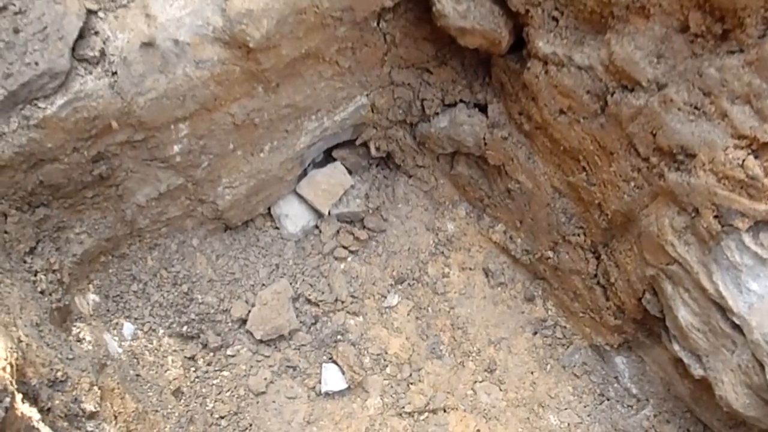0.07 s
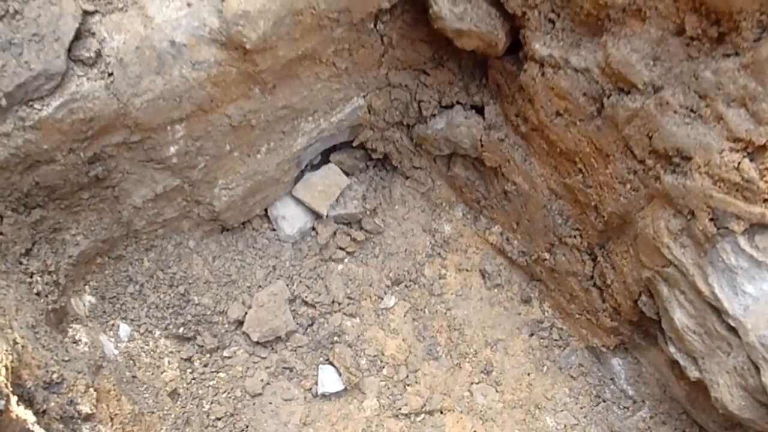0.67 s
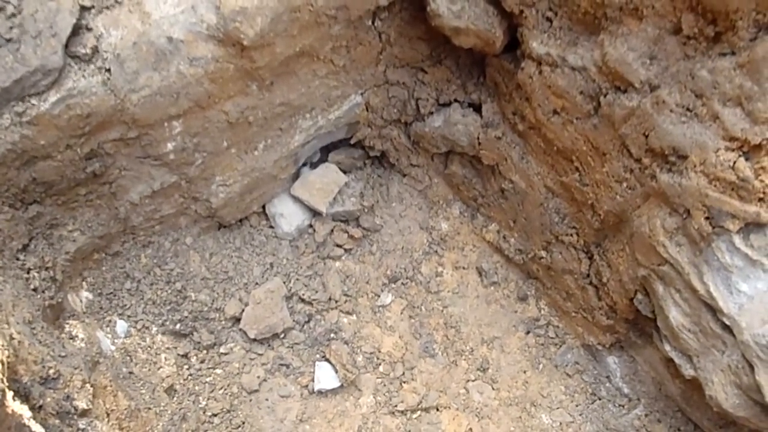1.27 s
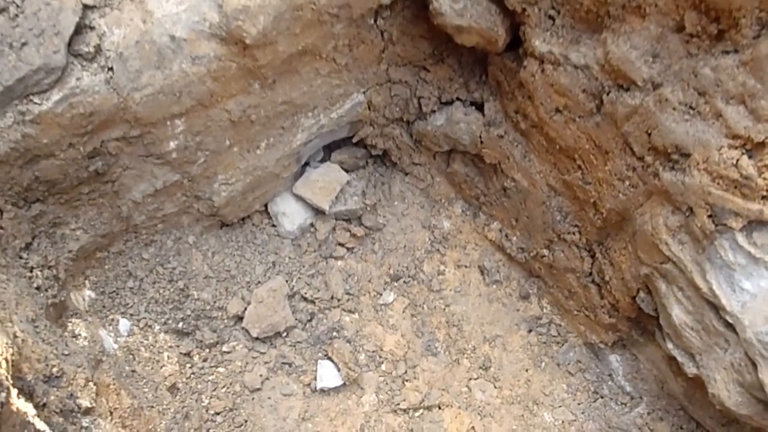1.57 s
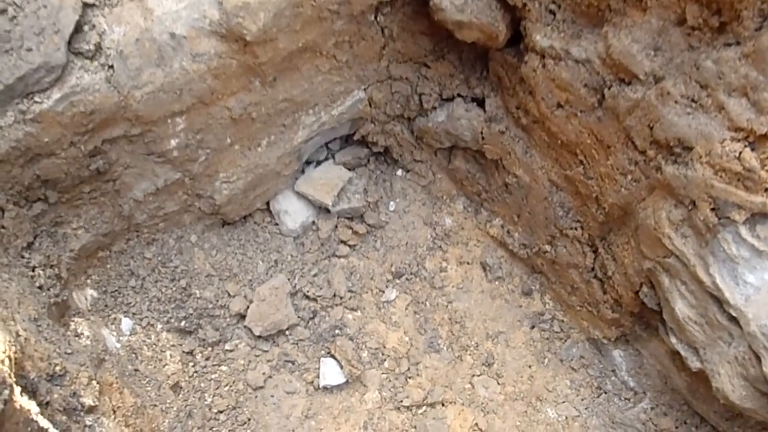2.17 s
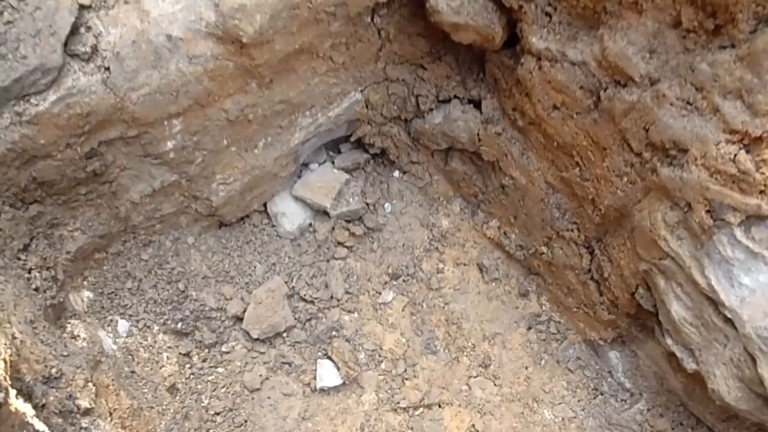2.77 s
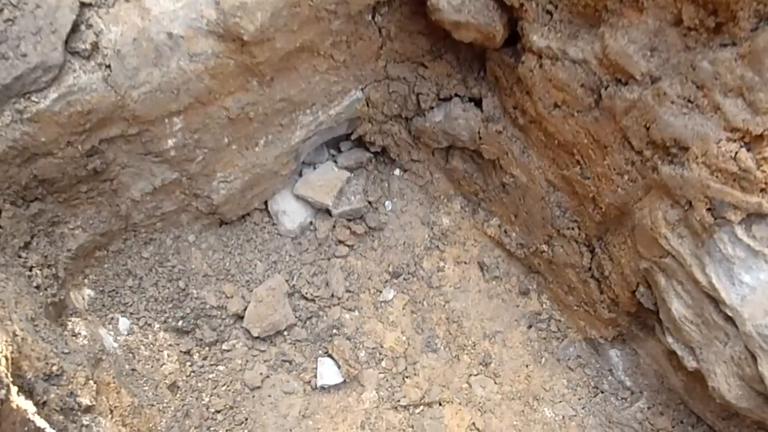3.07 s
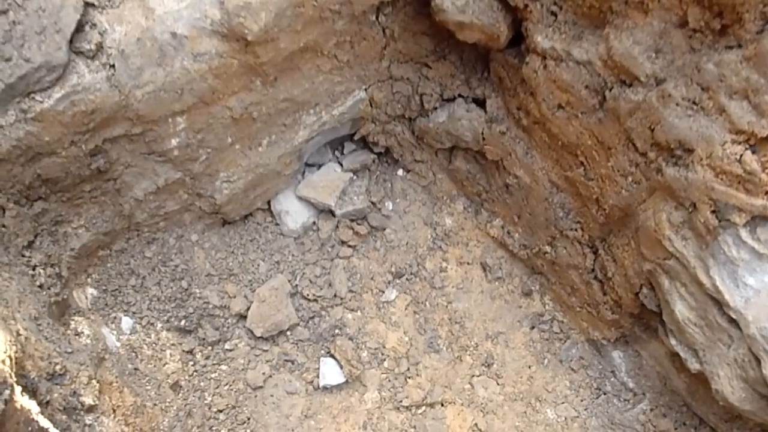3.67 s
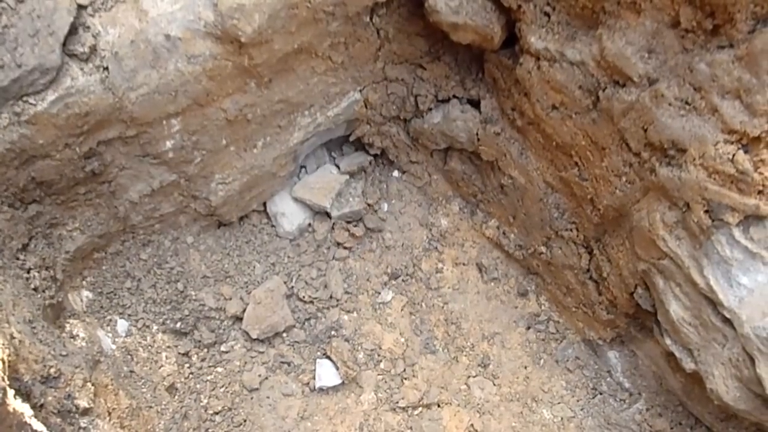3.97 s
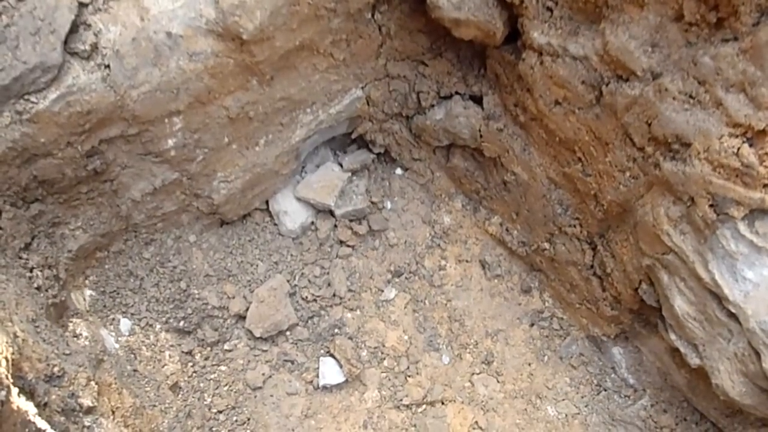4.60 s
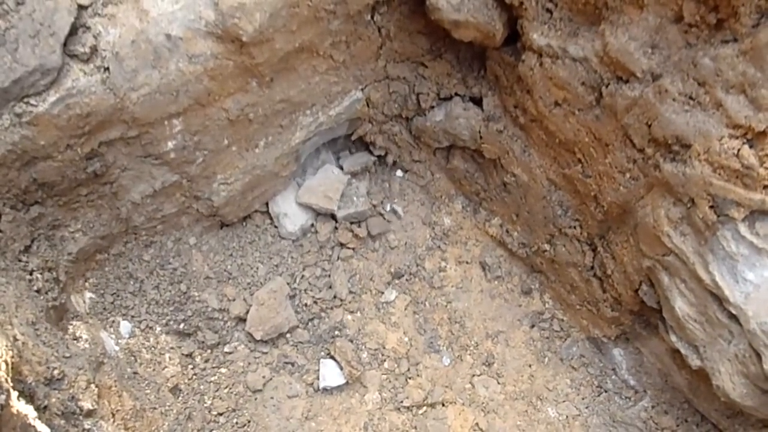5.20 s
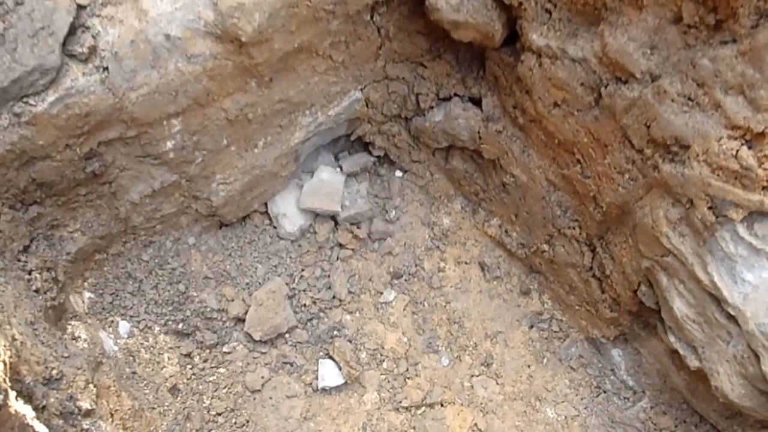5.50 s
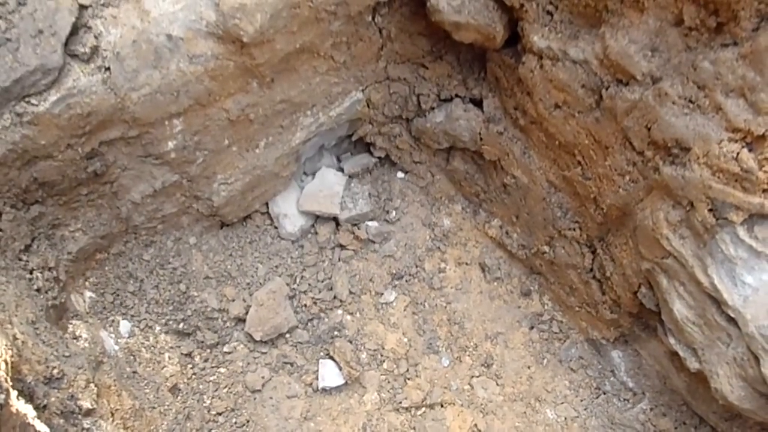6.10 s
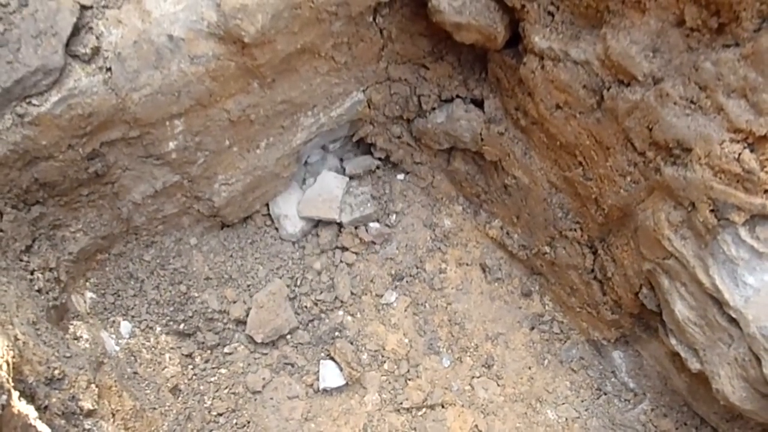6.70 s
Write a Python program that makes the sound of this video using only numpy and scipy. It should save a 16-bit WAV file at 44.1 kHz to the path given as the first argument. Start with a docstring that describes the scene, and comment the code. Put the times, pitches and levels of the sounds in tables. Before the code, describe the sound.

Heard close up in a small dug pit, an air-driven tool pounds through rocky ground in a quick, even rhythm. Hard, gritty thumps alternate irregularly with lighter stony clatter carrying a thin metallic ring. Past the middle comes a run of solid blows, then the strength varies again. Low throbbing and a constant airy hiss continue throughout, the hiss dipping slightly at each loud hit.

```python
"""Low throbbing and hammering, about seven blows a second, over a steady hiss: a pneumatic mole
works just behind the rock wall of a small dug pit. A blow that bites thumps the rock face and
cracks grit; one that slips rattles loose stones and rings the steel body instead. Air throbs in
the bore and hisses out between blows. A limiter ducks at loud blows, and the hiss swells partway
back before the next."""
import sys
import numpy as np
from scipy import signal
from scipy.fft import rfft, irfft, next_fast_len
from scipy.io import wavfile
from scipy.ndimage import uniform_filter1d, minimum_filter1d

SR = 44100
rng = np.random.default_rng(int(sys.argv[2]) if len(sys.argv) > 2 else 0)


def store_wav(level_fs):
    """Save 16-bit WAV to argv[1]."""
    pcm = np.round(np.clip(np.atleast_2d(level_fs), -1, 1) * 32767)
    wavfile.write(sys.argv[1], SR, pcm.T.astype(np.int16))


N = 302085
BLOW_T_S = np.arange(4096) / SR


def from_db(db):
    """Decibels to gain."""
    return 10 ** (np.asarray(db) / 20)


def unit_energy(x):
    """Scale to the energy of 10 ms at rms 1."""
    return x / np.sqrt(np.sum(x ** 2) / (SR / 100) + 1e-20)


def add(out, x, start_s):
    """Mix x into out from start_s on."""
    at = int(round(start_s * SR))
    x, at = x[max(-at, 0):], max(at, 0)
    out[at:at + len(x)] += x[:max(N - at, 0)]


def resonance(x, hz, width_hz):
    """Band-pass, peak gain 1."""
    r = np.exp(-np.pi * width_hz / SR)
    feedback = [1, -2 * r * np.cos(2 * np.pi * hz / SR), r * r]
    return signal.lfilter(np.array([1, 0, -1]) * (1 - r * r) / 2, feedback, x + 1e-18)


def ring(drive, hz, t60_s):
    """Damped mode: a unit click starts a sine of height 1."""
    r, w = np.exp(-np.log(1000) / (t60_s * SR)), 2 * np.pi * hz / SR
    return signal.lfilter([0, np.sin(w)], [1, -2 * r * np.cos(w), r * r], drive + 1e-18)


def noise(spectrum, shape=(N,)):
    """Noise of rms 1; spectrum rows are (frequency [Hz], relative density [dB])."""
    hz, level_db = np.transpose(spectrum)
    size = next_fast_len(shape[-1])
    bins_hz = np.maximum(np.fft.rfftfreq(size, 1 / SR), 1)
    gain = from_db(np.interp(np.log(bins_hz), np.log(hz), level_db))
    x = irfft(rfft(rng.standard_normal(shape), size) * gain, size)
    return x[..., :shape[-1]] / x.std()


def swell(start_s, rise_s):
    """Envelope: 0 until start_s, 1 after a further rise_s, then decay."""
    u = np.maximum(BLOW_T_S - start_s, 0) / max(rise_s, 1e-5)
    return u * np.exp(1 - u)


def clicks(times_s, sizes):
    """Train of one-sample clicks."""
    out = np.zeros(N)
    for s, size in zip(times_s, sizes):
        add(out, np.array([size]), s)
    return out


# Piston blows: (time [s], bite [dB]); near 0 lands squarely, near -18 slips
BLOWS = [(0.0786, -15.5), (0.2172, -1), (0.3594, -16.5), (0.4974, -1.5), (0.6385, -18.0), (0.7776, -4.5),
         (0.915, -8.5), (1.0502, -0.5), (1.1913, -12.5), (1.33, -5), (1.4646, 0), (1.6047, -15),
         (1.7432, 0.5), (1.8902, -17), (2.0295, -3.0), (2.1665, -8), (2.302, 1), (2.4438, -17),
         (2.5832, -8.5), (2.7185, 1.5), (2.8593, -18.5), (2.999, -7), (3.1358, 1.0), (3.2809, -18),
         (3.4207, -3.0), (3.5544, -1), (3.6921, -8.5), (3.8279, 0.5), (3.9743, -16.5), (4.1144, -2),
         (4.2489, -3.5), (4.3837, -4.0), (4.519, -1.5), (4.6535, -1), (4.7896, -2), (4.9244, -2.0),
         (5.061, -3.0), (5.1957, 0), (5.3371, -17), (5.4776, -1.5), (5.619, -20), (5.7596, -7), (5.8965, 0),
         (6.0412, -16), (6.182, -3), (6.3162, -2.5), (6.452, -0.5), (6.5871, 0.5), (6.7317, -17)]
STRIKES_S, BITE_DB = np.transpose(BLOWS)

def bite_level_db(full_bite_db, slope, spread_db):
    """A part's level at each blow: linear in the bite, plus chance."""
    return full_bite_db + slope * BITE_DB + rng.normal(0, spread_db, len(BLOWS))


# Colour drift as the tool works forward:
# (time [s], knock [dB], clack [dB], clink [dB], steel ring [dB], clink pitch [Hz])
ADVANCE = [(0.1, -1.7, -6, -6.5, -0.2, 4820), (1.498, -1.5, 3, 3, 11.5, 4830), (2.2, 1, 0.5, -0.5, 5, 4980),
           (3.1, -3.6, -2, -6.5, 5.5, 4810), (4.2, 3, -4.3, 0.5, -4.5, 4936),
           (5.0, 2, -6, -0.1, -0.5, 4820), (5.7, 0.3, -5.8, 3.5, 0.5, 5130),
           (6.7, -2.3, -0.9, -4.2, -3.5, 4980)]

def advance():
    """Four level offsets and the clink pitch, interpolated to each blow."""
    time_s, *columns = np.transpose(ADVANCE)
    return [np.interp(STRIKES_S, time_s, column) for column in columns]


# Air and site noise: (frequency [Hz], relative density [dB])
SITE_SPECTRUM = [(25, -34.5), (40, -17.5), (60, 10.5), (130, 9.5), (260, 7), (450, 5.5), (800, 1.5),
                 (1300, -5), (1900, -2.5), (2700, -10), (4700, -1.5), (6000, -11), (7200, -13.5),
                 (9000, -19), (14000, -17.5)]

def site_hiss(db):
    """Steady background of air and site."""
    return from_db(db) * noise(SITE_SPECTRUM)


# Air column behind the tool: (frequency [Hz], width [Hz], level [dB])
BORE_MODES = [(84.3, 10.1, 4.5), (59.7, 6.1, -8), (243, 11, -16), (294, 14, -20.5), (412, 8.8, -19)]

def bore_throb(valve_lead_s, valve_db, recoil_lag_s, recoil_db, soften_hz):
    """The air column throbs twice a cycle: as the piston turns round and as the tool recoils."""
    next_strike_s = STRIKES_S[-1] + np.median(np.diff(STRIKES_S))
    turns_s = np.append(STRIKES_S, next_strike_s) - valve_lead_s
    puffs = clicks(turns_s, from_db(valve_db + rng.normal(0, 1, len(turns_s))))
    puffs -= clicks(STRIKES_S + recoil_lag_s, np.full(len(BLOWS), from_db(recoil_db)))
    out = np.zeros(N)
    for hz, width_hz, db in BORE_MODES:
        mode = ring(puffs, hz, t60_s=np.log(1000) / (np.pi * width_hz))
        # soft puffs: each mode builds up gradually
        out += from_db(db) * resonance(resonance(mode, hz, soften_hz), hz, soften_hz)
    return out


def throb_ticks(throb, db, spread_db, dull_hz):
    """Faint dull ticks at each trough of the low throb, far louder when it throbs hard."""
    troughs, _ = signal.find_peaks(-throb, distance=SR // 130)
    depth = np.clip(-throb[troughs] / np.abs(throb).max(), 0, 1)
    chance_db = rng.normal(0, spread_db, len(troughs))
    ticks = clicks(troughs / SR, -depth ** 3 * from_db(db + chance_db))
    band = signal.butter(1, [300, dull_hz], "band", fs=SR, output="sos")
    return signal.sosfilt(band, ticks + 1e-18)


# Hollow of the pit: (frequency [Hz], width [Hz], level [dB])
PIT_MODES = [(190, 120, -17), (266, 48, 10), (444.5, 54.4, 8), (532.5, 70, 6), (671.5, 66, 4),
             (1058, 150, 5)]

def rock_thump():
    """The rock face jumps: one short pressure pulse, prolonged by the hollow of the pit."""
    pulse = -swell(0, rise_s=0.00014 * np.exp(rng.normal(0, 0.2)))
    hollow = sum(from_db(db + rng.normal(0, 3.6)) * resonance(pulse, hz, width_hz)
                 for hz, width_hz, db in PIT_MODES)
    return unit_energy(pulse + hollow)


def stone(hz, t60_s, start_s, rise_s, rough):
    """A stone is shaken into a heavily damped resonance; grinding contacts roughen it."""
    shake = np.sin(2 * np.pi * (hz * BLOW_T_S + rng.random()))
    grind = resonance(rng.standard_normal(len(BLOW_T_S)), hz, hz / 3)
    drive = swell(start_s, rise_s) * (shake + rough * grind / grind.std())
    return unit_energy(resonance(drive, hz, width_hz=np.log(1000) / (np.pi * t60_s)))


def grit_crack(start_s, rise_s, band_hz):
    """Grit is crushed in about a millisecond, just after the rock moves."""
    crush = rng.standard_normal(len(BLOW_T_S)) * swell(start_s, rise_s) ** 2
    band = signal.butter(1, band_hz, "band", fs=SR, output="sos")
    return unit_energy(signal.sosfilt(band, crush))


# Echoes off the pit walls: (delay [s], gain [ratio])
WALL_ECHOES = [(.0021, 0.43), (.0039, -0.27), (.0052, -0.15), (.0096, -0.068)]
# Sound scattered in the pit: (frequency [Hz], relative density [dB])
SCATTER_SPECTRUM = [(100, -7), (300, -41.5), (500, -10.5), (800, -8.5), (1200, -7.5), (1900, 4.5),
                    (2800, -7.5), (4000, -5.5), (5000, -2), (7000, -9), (10000, -38), (14000, -21.5)]

def hammering(scatter_db, scatter_t60_s, echo_wander, wear_per_s):
    """Each blow: thump, four ever smaller stones and a crack, then wall echoes and a scattered tail."""
    tail_envelope = from_db(-60 * BLOW_T_S / scatter_t60_s) * np.clip((BLOW_T_S - 0.001) / 0.00083, 0, 1)
    tails = noise(SCATTER_SPECTRUM, (len(BLOWS), len(BLOW_T_S))) * tail_envelope
    wall_lowpass = signal.butter(4, 5500, fs=SR, output="sos")
    knock_drift_db, clack_drift_db, clink_drift_db, _, clink_pitch_hz = advance()
    wear_db = wear_per_s * STRIKES_S * BITE_DB  # as loose grit is used up, bite matters more
    thump_gain = from_db(bite_level_db(-5.5, slope=0.95, spread_db=0.24))
    knock_gain = from_db(bite_level_db(-14, slope=0.069, spread_db=0.79) + knock_drift_db)
    ring_gain = from_db(bite_level_db(-21.5, slope=-0.65, spread_db=1.2))
    clack_gain = from_db(bite_level_db(-18, slope=-0.41, spread_db=1.4) + clack_drift_db)
    clink_gain = from_db(bite_level_db(-13, slope=-0.03, spread_db=1.2) + clink_drift_db)
    crack_gain = from_db(bite_level_db(-5, slope=0.58, spread_db=1.3) + wear_db)
    out = np.zeros(N)
    for i, strike_s in enumerate(STRIKES_S):
        settling = np.exp(rng.normal(0, [0.14, 0.014, 0.044, 0.025]))  # stones resettle each time
        knock_hz, ring_hz, clack_hz, clink_hz = settling * [1200, 1890, 3900, clink_pitch_hz[i]]
        blow = (
            thump_gain[i] * rock_thump()
            + knock_gain[i] * stone(knock_hz, t60_s=0.0022, start_s=0.0001, rise_s=0.00053, rough=0.82)
            + ring_gain[i] * stone(ring_hz, t60_s=0.012, start_s=0.00061, rise_s=0.00097, rough=0.76)
            + clack_gain[i] * stone(clack_hz, t60_s=0.0017, start_s=0.00021, rise_s=0.00098, rough=5.2)
            + clink_gain[i] * stone(clink_hz, t60_s=0.0057, start_s=0.0006, rise_s=0.00096, rough=3.3)
            + crack_gain[i] * grit_crack(start_s=0.00057, rise_s=0.0005, band_hz=(2140, 8900)))
        add(out, blow + from_db(scatter_db) * tails[i], strike_s)
        echo = signal.sosfilt(wall_lowpass, blow)
        for delay_s, gain in WALL_ECHOES:
            # each blow leaves the rock at a slightly different spot
            add(out, gain * echo, strike_s + delay_s * np.exp(rng.normal(0, echo_wander)))
    return out


# Steel body: (frequency [Hz], level [dB], t60 [s])
STEEL_MODES = [(3498, 5.5, 0.3), (3580, -8.5, 0.18), (4220, 3.5, 0.11)]

def steel_ring(return_lag_s, return_db, waver):
    """The piston rings the steel body and nudges it again on its way back; the ring wavers."""
    _, _, _, drift_db, _ = advance()
    strike_db = bite_level_db(-49.5, slope=-0.24, spread_db=2.7) + drift_db
    uneven_db = rng.normal(0, 1, (len(BLOWS), len(STEEL_MODES)))
    returns_s = STRIKES_S + return_lag_s + rng.normal(0, 0.0025, len(BLOWS))
    out = np.zeros(N)
    for k, (hz, mode_db, t60_s) in enumerate(STEEL_MODES):
        sizes = from_db(strike_db + mode_db + uneven_db[:, k])
        hits = clicks(STRIKES_S, sizes) + clicks(returns_s, sizes * from_db(return_db))
        out += ring(hits, hz, t60_s)
    return out * (1 + waver * noise([(20, -2.5), (60, -1.5), (200, -31.0), (2000, -67.5)]))


# High modes of the steel body: (frequency [Hz], level [dB], t60 [s])
PING_MODES = [(7149, -23, 0.4), (8110, 2, 0.085)]

def steel_ping():
    """The body's high modes are hit unevenly from blow to blow."""
    out = np.zeros(N)
    for hz, mode_db, t60_s in PING_MODES:
        sizes = from_db(bite_level_db(-39.5, slope=0.12, spread_db=4.3) + mode_db)
        out += ring(clicks(STRIKES_S, sizes), hz, t60_s)
    return out


# Exhaust air: (frequency [Hz], relative density [dB])
EXHAUST_SPECTRUM = [(1000, -25.5), (1900, 5.5), (2700, -13.5), (3700, 3), (4700, 6.5), (5300, 1.5),
                    (6000, -16), (9000, -21.5), (14000, -54.5)]

def exhaust(db, lag_s, rise_s, flutter):
    """Air sputters out on the return stroke, most after a blow that slips."""
    flow = np.zeros(N)
    for strike_s, vent_db in zip(STRIKES_S, bite_level_db(-2.5, slope=-0.33, spread_db=2.2)):
        add(flow, from_db(vent_db) * swell(0, rise_s), strike_s + lag_s)
    sputter = np.exp(flutter * noise([(150, -4.0), (400, -16.5), (2000, -58.5)]))
    return from_db(db) * flow * sputter * noise(EXHAUST_SPECTRUM)


def scene():
    """The tool in its pit over a steady hiss, mono."""
    blows = hammering(scatter_db=-4.3, scatter_t60_s=0.034, echo_wander=0.06, wear_per_s=0.13)
    body = steel_ring(return_lag_s=0.047, return_db=-18.5, waver=0.28) + steel_ping()
    throb = bore_throb(valve_lead_s=0.0715, valve_db=-30, recoil_lag_s=0.0068, recoil_db=-31,
                       soften_hz=85)
    vent = exhaust(db=-47, lag_s=0.024, rise_s=0.011, flutter=0.42)
    hiss = site_hiss(db=-49.5)
    ticks = throb_ticks(throb, db=-15, spread_db=1.5, dull_hz=3000)
    return (hiss + throb + ticks + blows + body + vent)[None]


def limiter(x, limit_db, release_db_per_s):
    """Gain drops just ahead of a loud sound and climbs back in small steps."""
    level_db = 10 * np.log10(np.maximum(uniform_filter1d(x ** 2, size=200), 1e-12))
    excess_db = np.maximum(level_db - limit_db, 0)
    release_db = release_db_per_s * np.arange(N) / SR
    cut_db = np.maximum.accumulate(excess_db + release_db, axis=-1) - release_db
    gain_db = uniform_filter1d(minimum_filter1d(-cut_db, size=260), size=80)  # look-ahead
    stepped_db = gain_db[..., np.arange(N) // 512 * 512]
    return x * from_db(np.minimum(gain_db, stepped_db))


def record(dry):
    """Limiter, rounded peaks, treble cut."""
    ceiling, stopband_hz = 0.72, 14400
    limited = limiter(dry, limit_db=-11, release_db_per_s=60)
    rounded = limited / (1 + (limited / ceiling) ** 4) ** 0.25
    return signal.sosfiltfilt(signal.cheby2(12, 35, stopband_hz, fs=SR, output="sos"), rounded)


dry = scene()
out = record(dry)
store_wav(out)
```